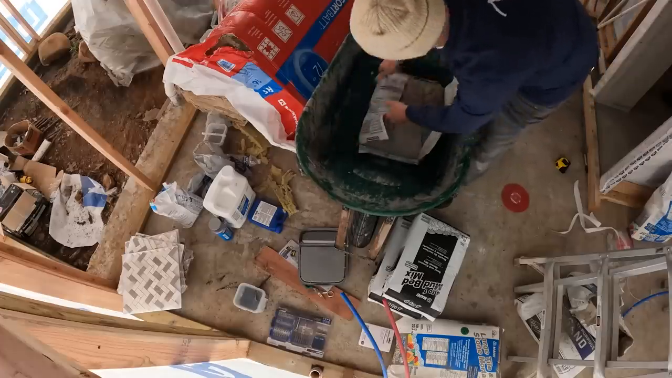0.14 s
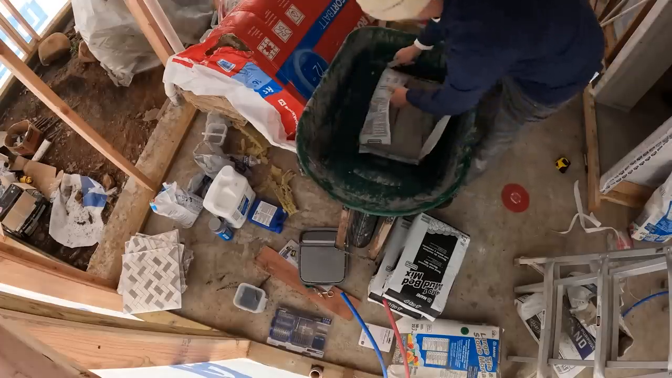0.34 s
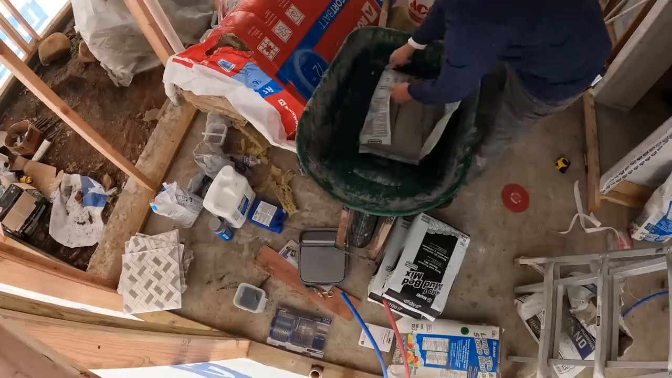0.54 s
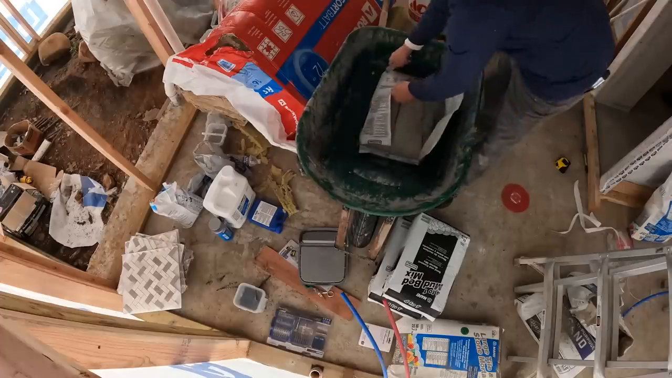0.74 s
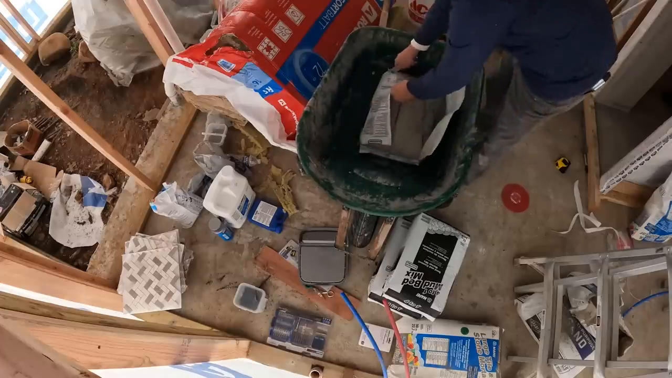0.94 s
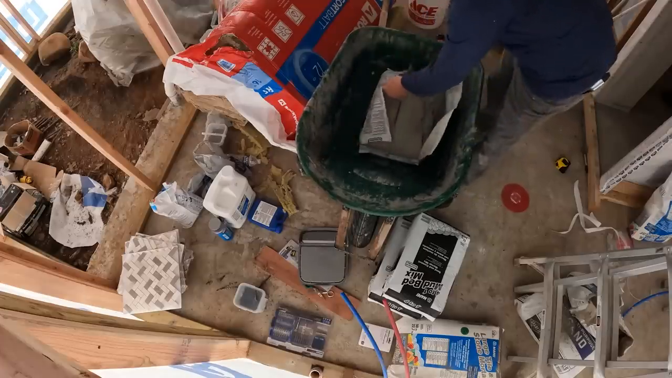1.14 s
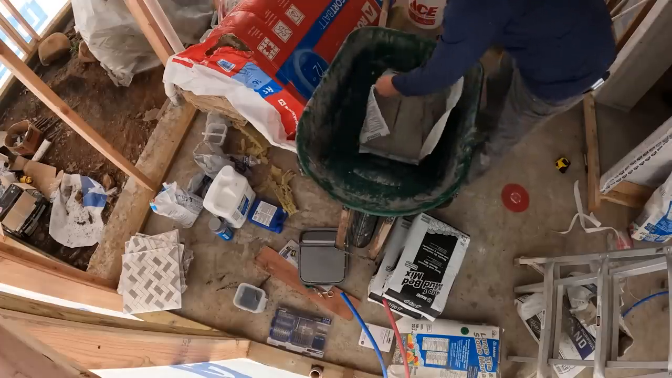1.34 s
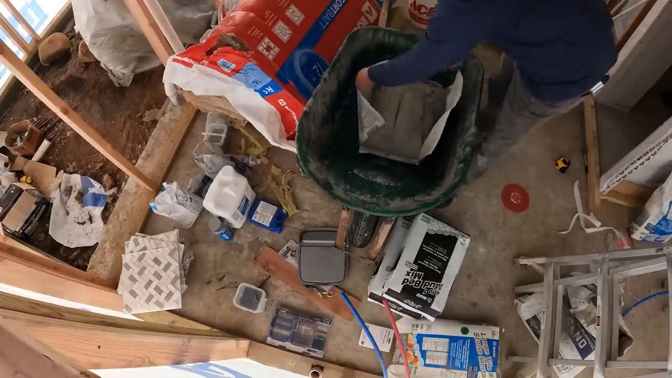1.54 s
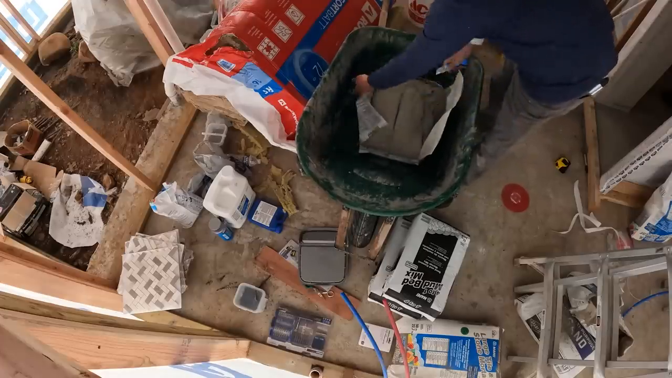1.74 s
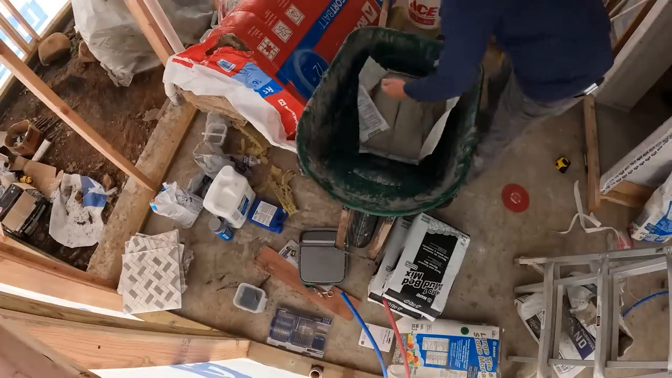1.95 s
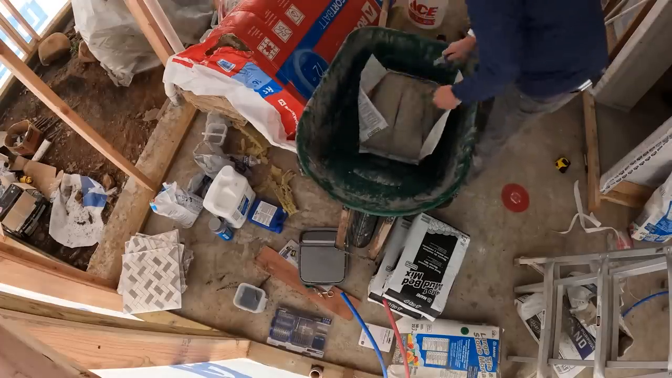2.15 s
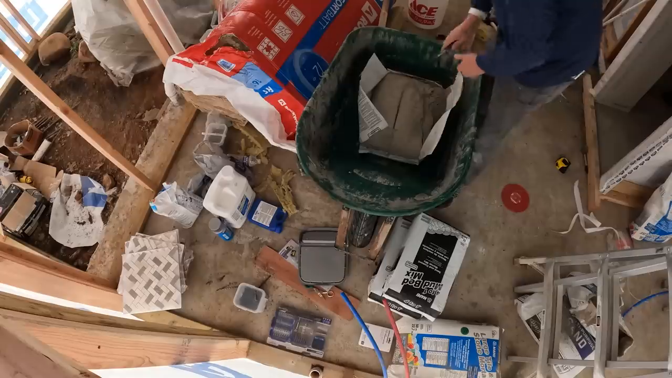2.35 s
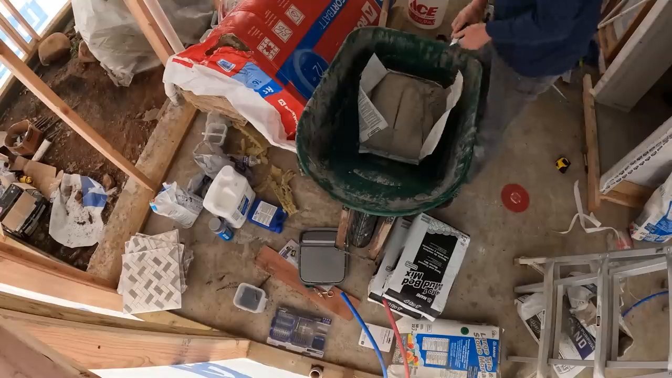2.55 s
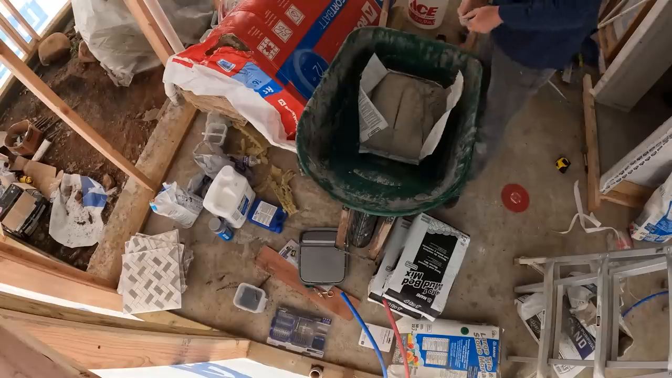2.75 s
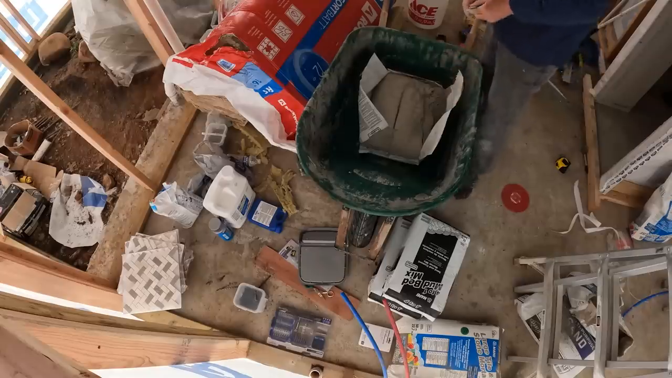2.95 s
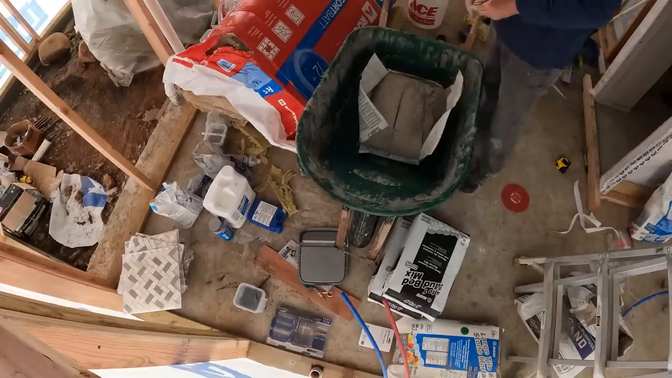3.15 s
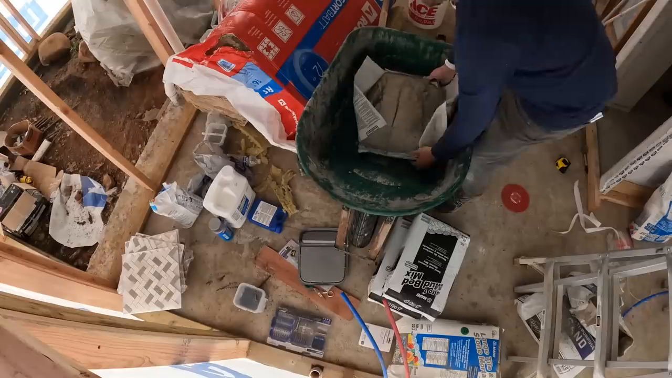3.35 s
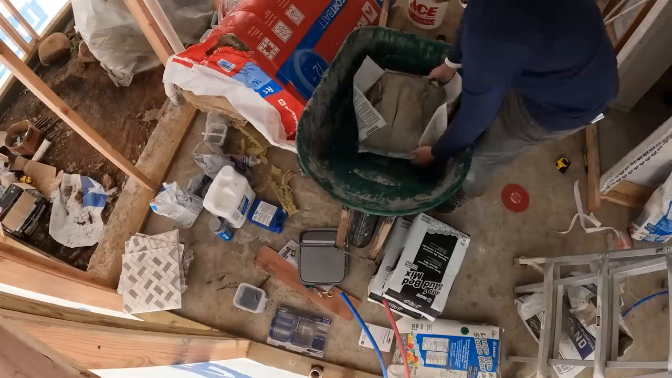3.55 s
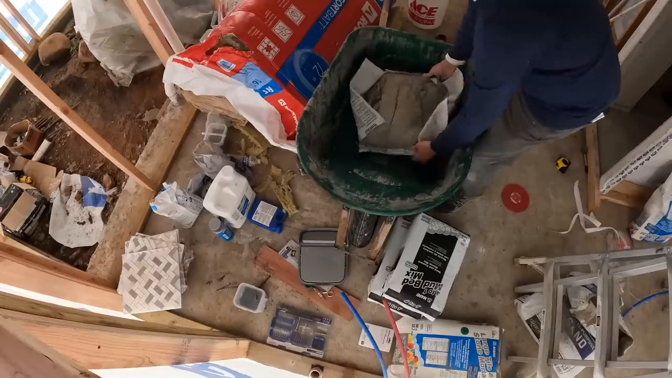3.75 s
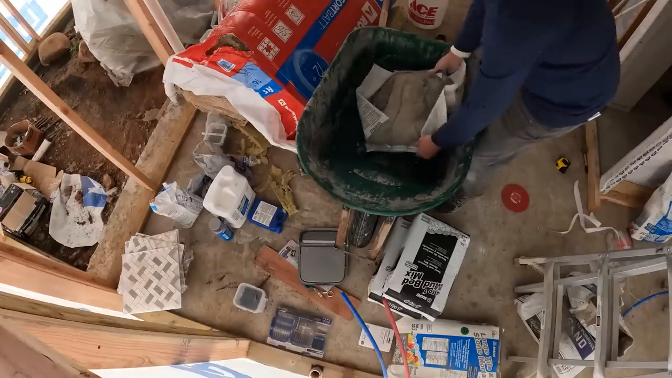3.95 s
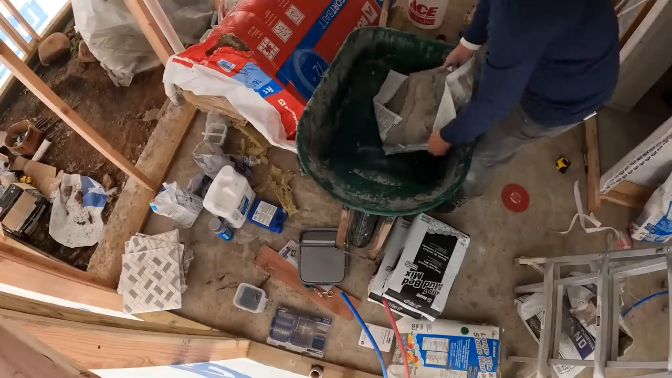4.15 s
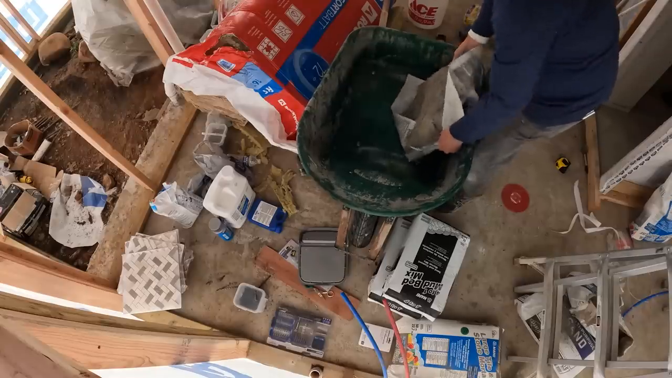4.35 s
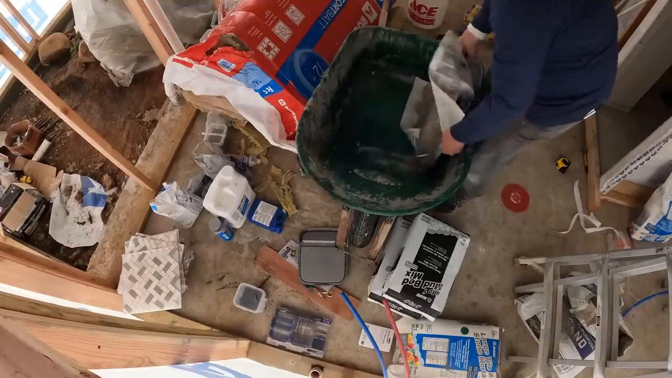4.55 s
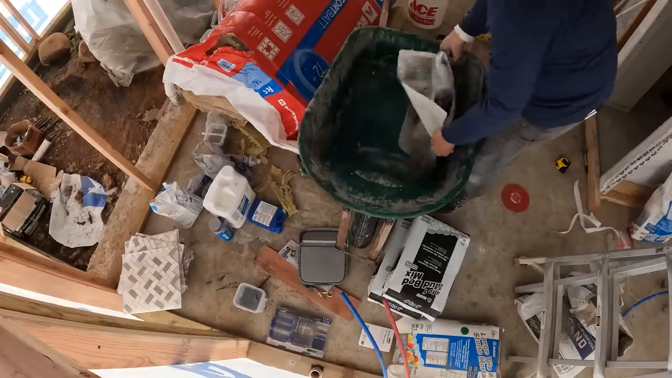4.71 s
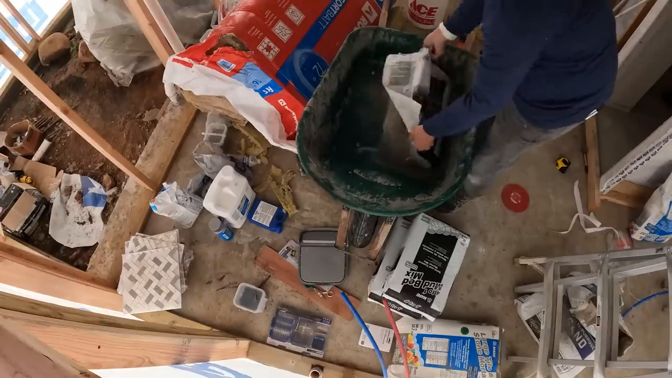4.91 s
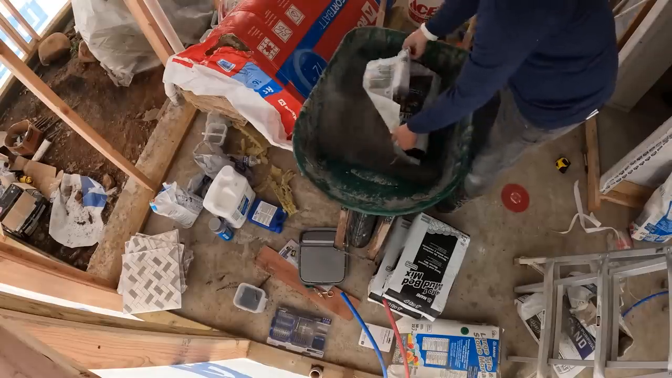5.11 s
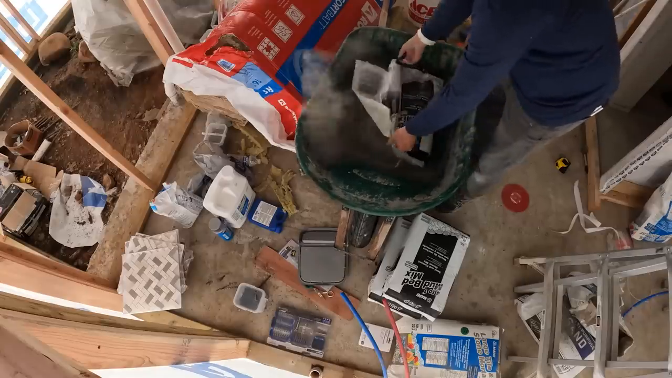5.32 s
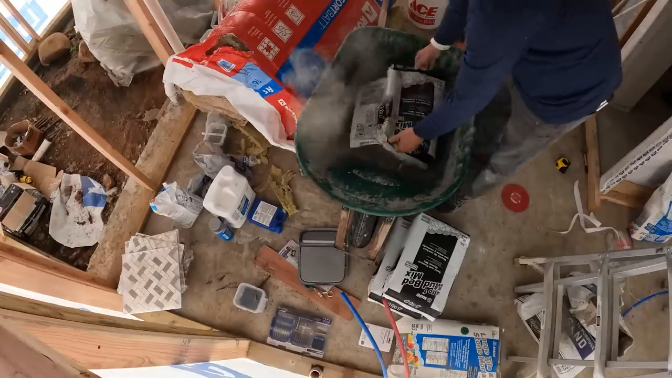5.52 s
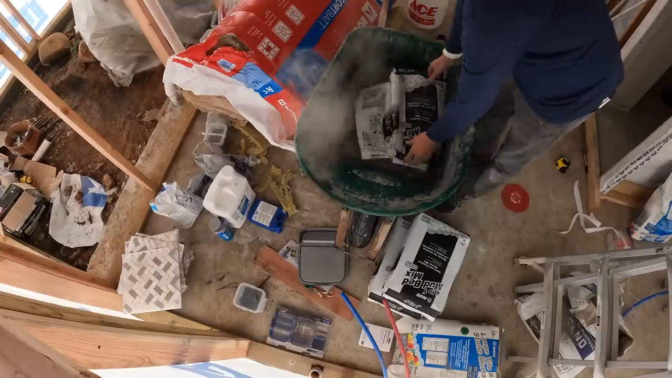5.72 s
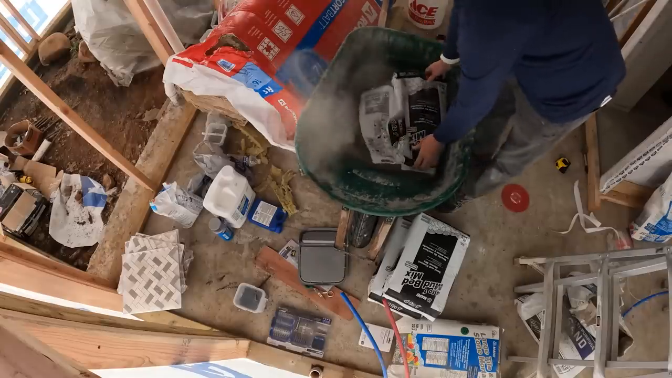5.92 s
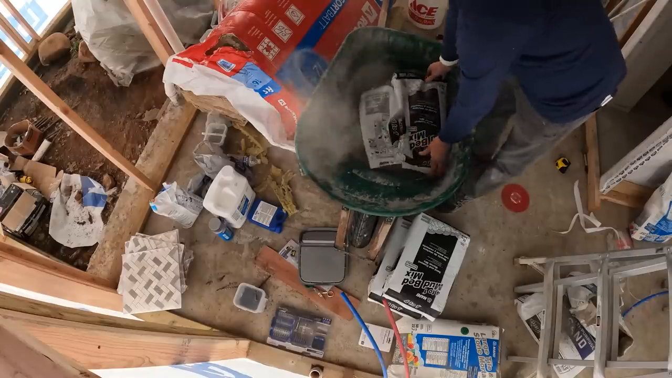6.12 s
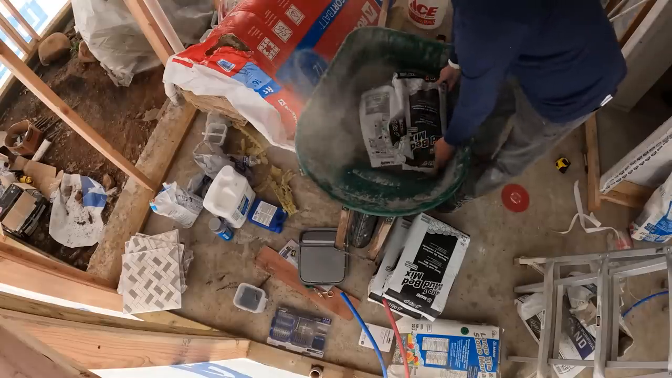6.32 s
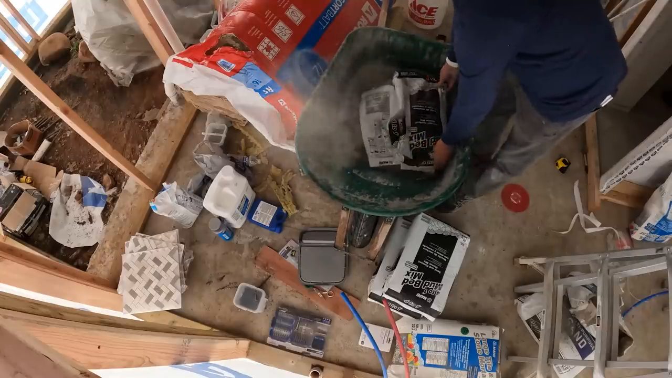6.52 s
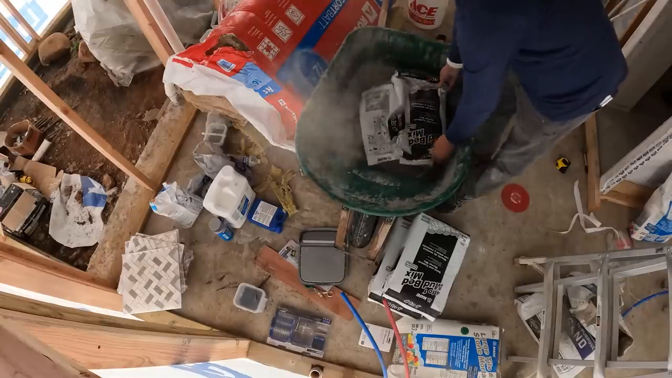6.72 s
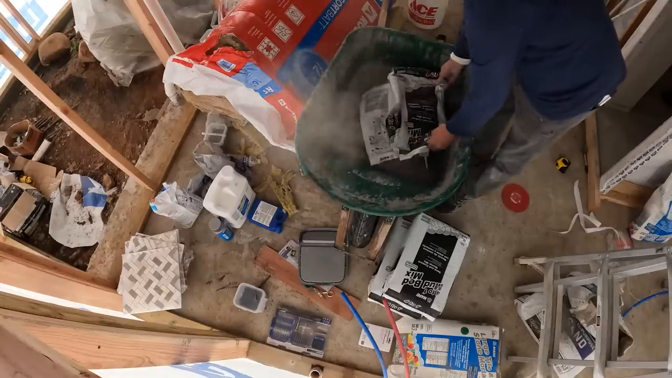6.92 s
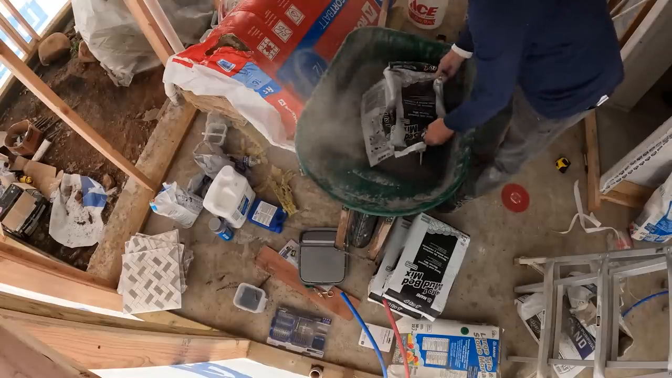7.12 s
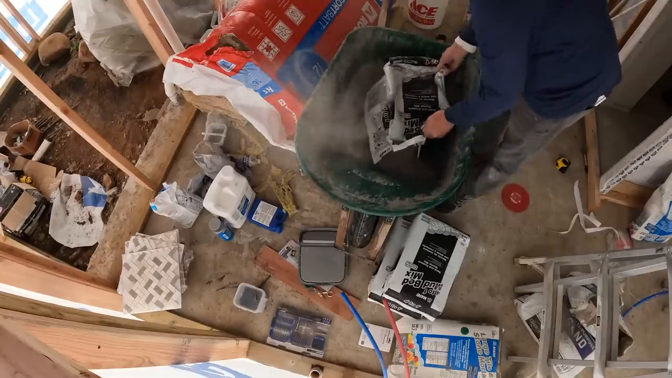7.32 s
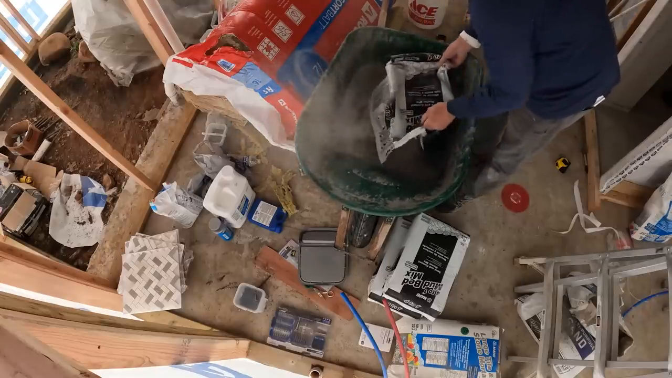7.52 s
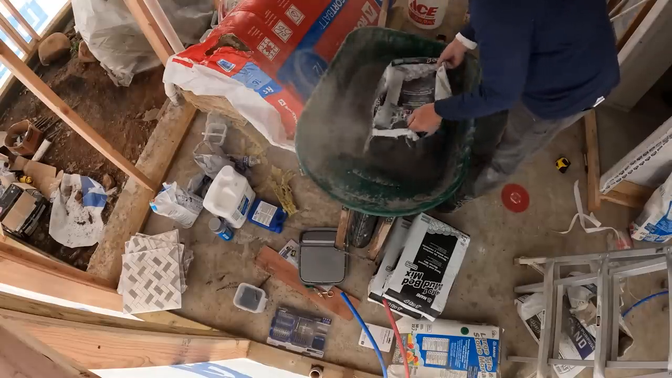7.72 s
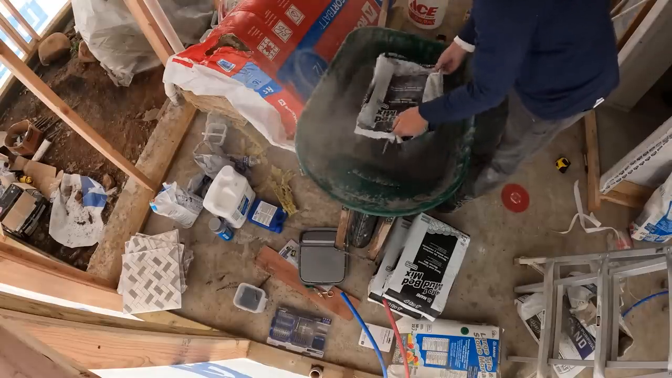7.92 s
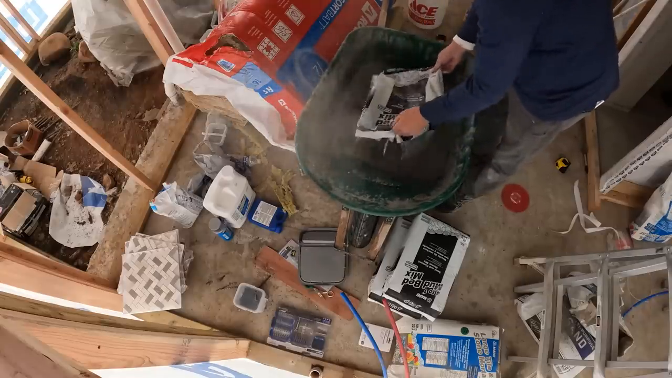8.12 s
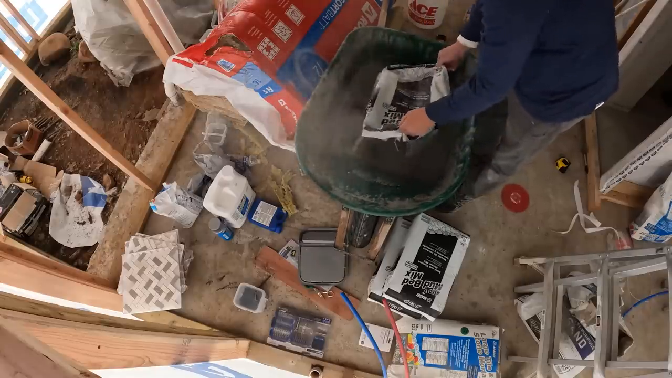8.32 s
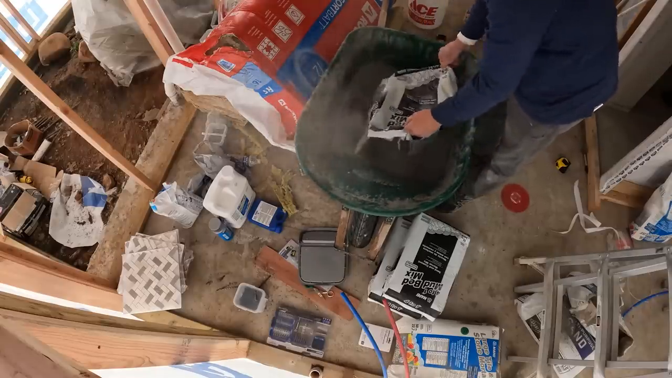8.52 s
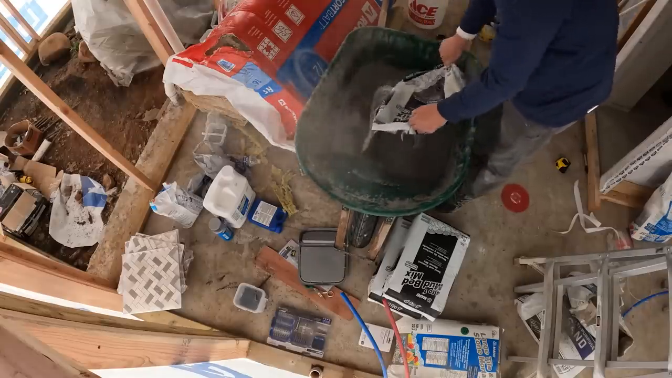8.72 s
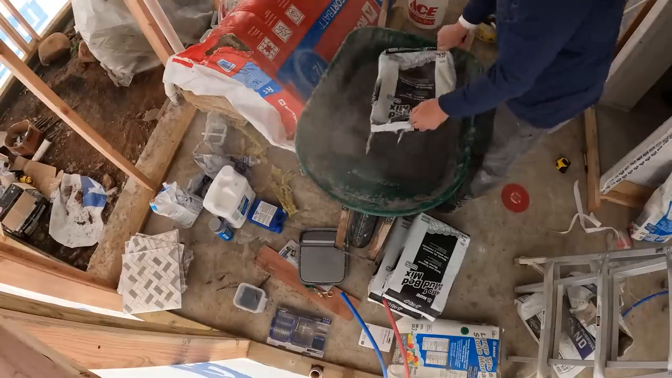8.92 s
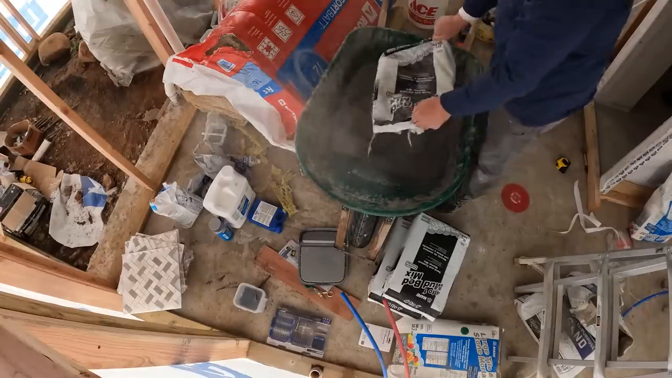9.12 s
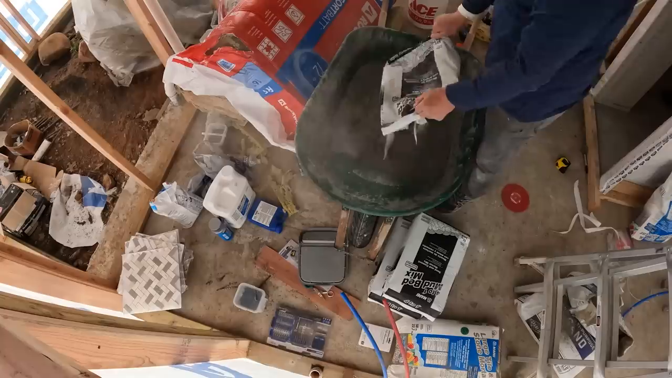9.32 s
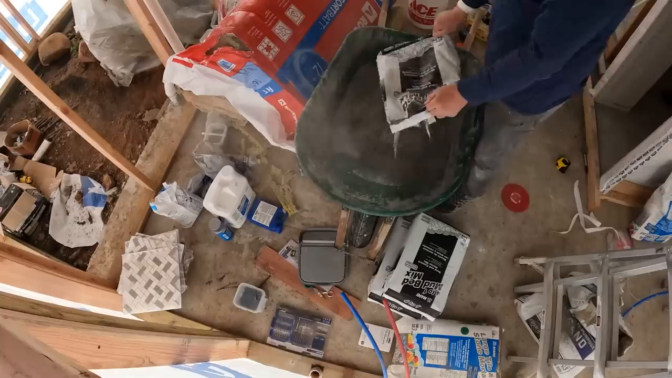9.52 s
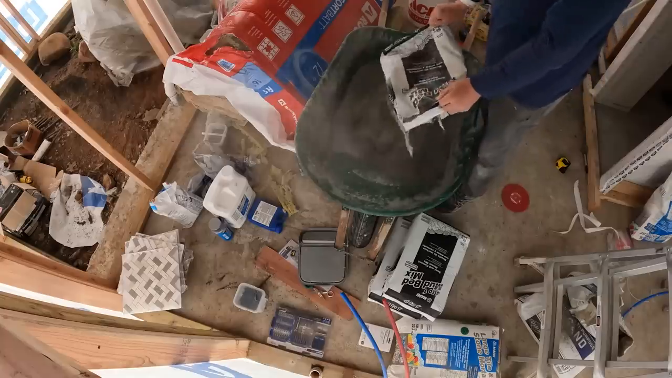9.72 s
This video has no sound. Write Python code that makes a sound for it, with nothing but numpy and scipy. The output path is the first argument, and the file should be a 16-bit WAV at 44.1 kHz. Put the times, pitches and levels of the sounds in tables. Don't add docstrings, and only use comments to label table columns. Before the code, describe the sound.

A stiff paper sack is rustled and snapped open, then tipped with heavy booming thumps into a steel tub, powder hissing, and shaken empty with crackling flaps.

```python
import sys
import numpy as np
from scipy import signal
from scipy.fft import rfft, irfft, next_fast_len
from scipy.io import wavfile
from scipy.ndimage import uniform_filter1d, map_coordinates

SR = 44100
rng = np.random.default_rng(int(sys.argv[2]) if len(sys.argv) > 2 else 0)


def gain_from_db(level_db):
    decades = np.asarray(level_db, float) / 20
    return 10 ** decades


def persist_wave(psi):
    counts = np.round(np.clip(psi, -1, 1) * 32767).astype(np.int16)
    wavfile.write(sys.argv[1], SR, np.atleast_2d(counts).T)


N = 430416


def unit(x):
    return x / np.sqrt(np.mean(x ** 2) + 1e-20)


def along(points, hz):
    f, v = np.transpose(points)
    return np.interp(np.log(hz + 1), np.log(f + 1), v)


def curves(rows):
    s, *cols = np.transpose(rows)
    return [np.interp(np.arange(N) / SR, s, c) for c in cols]


def steps():
    return np.arange(0, N / SR + .002, .002)


def swells(rows, rise, fall):
    s, hold, *cols = np.transpose(rows)[:, :, None]
    swelling = np.minimum(rise * (steps() - s), 0)
    easing = fall * np.maximum(steps() - s - hold, 0)
    return swelling - easing, cols


def summed(bed_db, events_db):
    power = gain_from_db(2 * np.maximum(events_db, -200)).sum(axis=0)
    return 10 * np.log10(gain_from_db(2 * bed_db) + np.interp(np.arange(N) / SR, steps(), power))


def wobble(rate):
    coarse = np.arange(0, N + 64, 64)
    knots = rng.standard_normal(int(N * rate / SR) + 4)
    return np.interp(np.arange(N), coarse, map_coordinates(knots, [coarse * rate / SR]))


def filtered(x, response):
    m = next_fast_len(N + SR // 2)
    return irfft(rfft(x, m) * response(np.fft.rfftfreq(m, 1 / SR)), m)[..., :N]


def lowpass(f, hz, order=8):
    return 1 / (1 + (f / hz) ** order)


def highpass(f, hz):
    return 1 / (1 + (hz / (f + 1)) ** 8)


def resonant(modes):
    return lambda f: sum((-1) ** k * gain_from_db(db) * 1j * f * w / (c * c - f * f + 1j * f * w)
                         for k, (c, w, db) in enumerate(modes))


def patchy(patchy_db, size=4):
    z = signal.stft(rng.standard_normal((2, N)), nperseg=256, noverlap=128)[2].astype(np.complex64)
    field = uniform_filter1d(rng.standard_normal(z.shape[1:]), size=size, axis=0)
    field = uniform_filter1d(field, size=6, axis=1)
    return unit(signal.istft(z * gain_from_db(patchy_db * unit(field)), nperseg=256)[1][:, :N])


# (frequency [Hz], likeness [0 to 1])
LIKENESS = [(60, 0.93), (300, 0.95), (640, 1), (1400, 0.93), (3100, 0.46), (7000, 0.86), (15000, 0.23)]


def spread(pair, response):
    turn = lambda hz: np.arccos(np.clip(along(LIKENESS, hz), -1, 1)) / 2
    mid, side = filtered(pair, lambda hz: response(hz) * [np.cos(turn(hz)), np.sin(turn(hz))])
    return unit(np.array([mid + side, mid - side]))


# (frequency [Hz], density [dB per Hz])
YARD_COLOUR = [(12, -44), (20, 6), (63, -10), (126, -5), (268, -20.5), (510, -19), (891, -65), (5780, -32),
               (9300, -45), (15800, -86)]


def yard_air():
    level_db = -58
    return gain_from_db(level_db) * spread(patchy(patchy_db=-1.0), lambda f: gain_from_db(along(YARD_COLOUR, f)))


# (frequency [Hz], t60 [s])
WALL_DECAY = [(200, 0.41), (1500, 0.087), (5000, 0.11), (12000, 0.059)]


def walls(x):
    out, step = np.zeros((2, N + SR)), SR // 2
    delay = 130
    for start in range(0, N, step):
        hz, t, z = signal.stft(rng.standard_normal((2, SR // 4)), SR, nperseg=256)
        decay = gain_from_db(-60 * t / along(WALL_DECAY, hz)[:, None])
        tail = signal.istft(z * decay, SR, nperseg=256)[1]
        answer = signal.fftconvolve(x[None, start:start + step], tail / np.linalg.norm(tail[0]), axes=1)
        out[:, start + delay:][:, :answer.shape[1]] += answer
    return out[:, :N]


# (frequency [Hz], level [dB], t60 [s])
PANEL_MODES = [(138.7, 3, 1.54), (168, -8.5, 2.2), (236, 2.5, 1.9), (266, -7, 0.92), (300.6, -2, 2),
               (310.5, 1.5, 1.63), (350, -6, 2.3), (380, -6, 0.93), (425, 1.5, 1.2), (436, -9, 1.4),
               (515, -13, 1.5), (523, -7, 1.2), (566, -40, 0.38)]


def panels(t, upper_db, damp, detune):
    hz, db, t60 = np.transpose(PANEL_MODES)[:, :, None]
    lift, shift, phase = rng.standard_normal((3, len(PANEL_MODES), 1))
    size = gain_from_db(db + upper_db * (hz > 300) + 2 * lift - 60 * t / (damp * t60))
    return np.sum(size * np.sin(2 * np.pi * hz * (1 + detune * shift) * t + phase), axis=0)


# (time [s], hold [s], lowest mode level [dB], second mode level [dB])
NUDGES = [(0, 0.12, -53, -44.5), (.15, 0.56, -54.5, -58), (.82, 0.23, -47.5, -51), (1.1, 0.23, -48, -42.5),
          (1.3, 0.4, -50, -51.5), (1.7, 0.3, -56.5, -74), (2.13, 0.68, -47.5, -50), (2.85, 0.59, -58, -68),
          (3.6, 0.23, -56, -53), (3.92, 0.61, -45.5, -41), (4.67, 0.12, -33, -35), (4.85, 0.2, -39, -42),
          (5.065, 0.033, -44, -23), (5.14, .035, -40, -22.5), (5.25, 0.087, -37, -22.5),
          (5.4, 0.11, -33, -29.5), (5.6, 0.38, -37.5, -48), (6.25, 0.19, -43.5, -40.5),
          (6.64, 0.16, -44, -59), (6.9, 0.81, -51.5, -63)]
# (lowest mode [dB], second mode [dB])
REST_LEVELS = [-59, -76]
# (time [s], frequency [Hz])
SECOND_MODE = [
    (0, 98.05),
    (2.05, 100),
    (2.1, 106.5),
    (2.9, 105.8),
    (3.5, 97.9),
    (9.76, 99),
]


def rocking():
    shape, modes = swells(NUDGES, rise=802, fall=140)
    low_db, second_db = (summed(rest, shape + db) for rest, db in zip(REST_LEVELS, modes))
    drift = lambda hz, unsteady: np.sin(2 * np.pi * np.cumsum(hz * (1 + unsteady * wobble(22))) / SR)
    low = gain_from_db(low_db + 1.0 + 1.7 * wobble(10)) * drift(56, unsteady=0.0988)
    second = gain_from_db(second_db + 1.0 + 3.35 * wobble(10)) * drift(curves(SECOND_MODE)[0], unsteady=0.0545)
    return low + second


# (time [s], peak level [dB], upper modes over peak [dB], rise [s])
BLOWS = [(1.111, -29, 3, 0.0039), (1.218, -50, 7, 0.0035), (2.111, -38, 5.5, 0.0041),
         (2.529, -58.5, 15, 0.0018), (3.591, -43, 4.5, 0.005), (3.892, -39.5, 23.5, 0.0024),
         (4.668, -15.5, 2.5, 0.003), (5.037, -19, 2, 0.0065), (5.068, -10.5, -32, 0.0039),
         (5.389, -15, 5.5, 0.0017), (6.24, -34, 6, 0.0034), (7.798, -45.5, 34.5, 0.011)]


def blows():
    out, t = np.zeros(N), np.arange(SR) / SR
    deep = signal.butter(2, [62, 240], "band", fs=SR)
    knock = signal.butter(2, [300, 900], "band", fs=SR)
    out[:SR] += gain_from_db(-45.0) * panels(t, upper_db=7.0, damp=0.96, detune=0)
    out[:SR] += gain_from_db(-21.5 - 60 * t / 1.4) * signal.lfilter(*deep, rng.standard_normal(SR))
    t = t[:SR // 2]
    sag = np.cumsum(72 + 60 * np.exp(-t / 0.0083)) / SR
    for s, db, upper_db, rise in BLOWS:
        loaded = s > 3.5
        thud, slap = rng.standard_normal((2, len(t)))
        push = gain_from_db(-17.5) * panels(t, upper_db, .18 if loaded else .4, detune=0.0284)
        push += gain_from_db(8.5 - 60 * t / 0.74) * signal.lfilter(*deep, thud)
        push += gain_from_db(upper_db - 1.0 - 60 * t / 0.13) * signal.lfilter(*knock, slap)
        push += gain_from_db(-3.5 - 60 * t / 0.21) * loaded * np.sin(2 * np.pi * sag)
        out[round(s * SR):][:len(t)] += gain_from_db(db) * push * (1 - np.exp(-t / rise))
    return out


# (time [s], length [s], pitch [Hz], level [dB])
SINGING = [(2.812, .03, 1520, -37), (2.827, 0.049, 1396, -38), (2.83, 0.046, 1140, -39.5),
           (2.838, 0.09, 924, -47), (3.21, 0.082, 1500, -55), (3.35, .045, 1560, -61),
           (3.697, 0.055, 370, -43), (4.267, 0.07, 1070, -36), (3.214, .08, 1910, -50),
           (5.399, 0.045, 380, -36), (1.252, 0.045, 1330, -39)]


def singing():
    out, edge_s = np.zeros(N), 0.004
    sag = 0.082
    for s, length, hz, db in SINGING:
        t = np.arange(round((length + 6 * edge_s) * SR)) / SR
        knots = rng.standard_normal((2, 12))
        stray, size = (np.interp(t, np.arange(12) / 85, k) for k in knots)
        shape = (1 - np.exp(-t / edge_s)) * np.exp(-np.maximum(t - length, 0) / edge_s)
        tone = np.sin(2 * np.pi * np.cumsum(hz * (1 - sag * t + 0.023 * stray)) / SR)
        out[round(s * SR):][:len(t)] += gain_from_db(db) * (0.84 + size) * shape * tone
    return out


def snaps(creases):
    out, t = np.zeros((2, N + SR)), np.arange(SR // 20) / SR
    sheet = signal.butter(2, [560, 4200], "band", fs=SR)
    bright = signal.butter(2, [3600, 9500], "band", fs=SR)
    fade = lambda t60: gain_from_db(-60 * t / t60)
    flap_fade = 1.02 * fade(0.0038) + 0.92 * fade(0.018) + 0.12 * fade(0.17)
    crack_fade = fade(0.013) + 0.079 * fade(0.028)
    onset = 1 - np.exp(-t / 0.00024)
    for s, db, crease_hz, bright_db in creases:
        dull, sharp = rng.standard_normal((2, len(t)))
        panel = 1.3 * np.sin(2 * np.pi * crease_hz * t) * fade(15 / crease_hz) * (1 - np.exp(-t * crease_hz))
        flap = 0.91 * signal.lfilter(*sheet, dull) * flap_fade
        crack = gain_from_db(bright_db + 2.0) * signal.lfilter(*bright, sharp) * crack_fade
        side = gain_from_db((1.1 * sharp[0] - 1.2) * np.array([[.5], [-.5]]))
        out[:, round(s * SR):][:, :len(t)] += gain_from_db(db - 5.5) * side * (panel + flap + crack) * onset
    return out[:, :N]


# (time [s], peak level [dB], crease pitch [Hz],
# brightness [dB])
MORE_TICKS = [(0.885, -31, 3390, -18), (1.258, -19, 1340, -18), (1.369, -24, 1140, -18), (1.437, -27, 1360, -18),
              (1.56, -30, 1410, -18), (1.717, -34, 1340, -18), (1.73, -21, 2430, -18), (3.575, -37, 1280, -18),
              (3.653, -24, 818, -18), (3.693, -33, 1200, -18), (6.828, -18.5, 730, -16), (7.72, -22, 1350, -18),
              (7.765, -19, 1260, -18), (7.877, -15, 1500, -18), (7.994, -21, 1250, -18), (8.207, -24, 1310, -18),
              (8.295, -20, 830, -18), (8.448, -19, 1520, -18), (8.479, -10, 2040, -16), (8.908, -23, 1190, -18),
              (9.547, -25, 1290, -18)]


def more_ticks():
    return gain_from_db(-2.0) * snaps(MORE_TICKS)


# (time [s], peak level [dB], crease pitch [Hz], brightness [dB])
TICKS = [(0.6602, -29.5, 1200, -19), (0.698, -27, 3450, -22), (0.7525, -30, 1250, -23),
         (0.7618, -25, 1370, -28), (0.7822, -27, 1180, -27), (0.8517, -32, 1320, -21),
         (1.033, -25.5, 4350, -7), (3.7408, -33, 1550, 7.5), (3.8243, -25.5, 2380, -11),
         (4.0946, -19, 1180, -8), (4.779, -36, 1360, -16), (4.8589, -17, 3190, -10),
         (4.872, -26, 1290, -16), (4.9035, -16.5, 1280, -16), (4.9705, -21, 1290, 4),
         (5.3306, -24.5, 2120, -1.5), (5.4844, -24, 840, -5), (5.714, -15.5, 1100, -19),
         (5.7419, -15.5, 1260, -6), (5.9366, -20.5, 1520, -12), (5.9698, -26, 1130, -24),
         (6.0706, -18.5, 2600, -21), (6.167, -28, 1200, -20), (6.1857, -21, 1090, -23),
         (6.294, -30.5, 1070, -10), (6.3664, -28, 1460, -14), (6.5879, -21, 770, -22),
         (6.6285, -24, 1340, -25), (6.6556, -24.5, 1030, -26), (6.683, -26, 1270, -19),
         (6.712, -29, 1320, -16), (8.0146, -22, 1250, -31), (8.1464, -21, 1620, -20),
         (8.1818, -23, 1270, -18), (8.3622, -31, 1150, -17), (8.6564, -30.5, 1350, -24),
         (8.734, -41, 1290, 2), (8.8275, -26, 1280, -24), (9.0246, -22, 1290, -26),
         (9.0982, -24, 1280, -17), (9.1775, -29, 1240, -19), (9.494, -25, 1210, -17),
         (9.625, -20, 950, -19), (9.6776, -24, 920, -15), (9.7313, -16.5, 1370, -15)]


def ticks():
    return gain_from_db(3.5) * snaps(TICKS)


# (time [s], peak level [dB],
# crease pitch [Hz], brightness [dB])
CREASES = [(0.7305, -14.5, 2030, -28), (0.9555, -17.5, 1500, -3), (1.052, -16.5, 1230, -33),
           (1.1151, -9, 3300, -2.5), (1.1257, -8, 1740, -7), (1.1383, -17.5, 3900, 3),
           (1.154, -11.5, 2570, -27), (1.1867, -12.5, 2500, -13), (1.2200, -2, 2400, -15),
           (1.2834, -16, 1260, -16), (1.522, -20.5, 1380, -29), (1.5818, -20, 1290, -36),
           (1.6372, -17.5, 880, -29.5), (1.7983, -12.5, 826, -10), (1.8128, -1.5, 3880, -4.5),
           (1.8422, -5.5, 2540, -30), (1.9639, -13, 1370, -13), (1.9949, -11.5, 2390, -26),
           (2.8105, -19, 1530, -20), (2.973, -32.5, 3350, -5), (3.1991, -44, 2830, -26.5),
           (3.407, -14, 2010, -11), (3.4478, -9, 1320, -4), (3.908, -12, 1600, -24),
           (4.4409, -6, 3930, -6.5), (4.5605, -12.5, 2020, -28), (5.1536, -12.5, 1120, -18),
           (5.2535, -15.5, 1300, -1), (5.444, -12, 2300, -31), (5.5091, -10, 950, -16),
           (5.5636, -11.5, 1220, -23), (5.6198, -10, 790, -6.5), (5.7265, -10.5, 1440, -4.5),
           (5.7655, -13, 2570, -7.5), (5.805, -17.5, 1150, -21), (5.8576, -9.5, 1270, -14),
           (5.9183, -15, 1580, -0.5), (5.9877, -15.5, 1180, -33), (6.023, -17.5, 1100, -28),
           (6.094, -12.5, 1280, -7), (6.1394, -10.5, 1180, -35), (6.1795, -11, 3020, -32),
           (6.204, -16, 1250, -29),
           (6.418, -16, 1180, -6.5), (6.4832, -18.5, 1180, -28), (6.5358, -14, 1180, -34),
           (6.7492, -11.5, 2520, -32), (6.7558, -10.5, 1250, -31), (6.8543, -9, 2940, -16),
           (6.8768, -16, 4700, 4), (6.9545, -9.5, 1290, -8), (6.907, -13.5, 1300, -15),
           (6.999, -9.5, 1330, -9), (7.012, -12.5, 1460, -11), (7.063, -8, 1330, -9),
           (7.068, -5.5, 1280, -9.5), (7.1067, -10, 4450, -23), (7.124, -8, 1380, -13),
           (7.1492, -9, 1240, 1.5), (7.8027, -5.5, 1330, -34), (7.859, -7, 1520, -10),
           (8.322, -16, 2540, -33), (8.468, -9, 3280, -33), (8.5022, -9, 1260, -34), (8.848, -14, 1150, -7),
           (8.9396, -6, 2400, -16), (9.2322, -18.5, 1180, -43), (9.5887, -9, 2870, -8)]


def creases():
    return snaps(CREASES)


def buckling(rate, scatter_db, t60):
    chance = rate / SR * gain_from_db(4.5 * wobble(18))
    sizes = gain_from_db(scatter_db * np.minimum(rng.exponential(size=N), 4))
    folds = (rng.random(N) < chance) * sizes
    return unit(signal.lfilter([1], [1, -gain_from_db(-60 / (t60 * SR))], folds))


# (time [s], rustle level [dB], crinkle of buckling over sliding powder [dB],
# cupping, the ring of the folded sheet [dB], slack, boom over rustle [dB])
GRIP = [(0, -47.5, 8.5, 20, 5), (.22, -48.5, 5, -8, -7), (.55, -44, 2, -19, -17), (.88, -57.5, 6, -17, 4),
        (1.25, -51.5, 3.5, 4.5, -2.5), (1.95, -39.5, 4.5, 0, -8.5), (2.09, -59.5, 9, -6, -9),
        (2.43, -71, 6, -12.5, -1), (2.75, -69.5, -18, 8, -4.5), (3.04, -70.5, 9.5, -8, 12.5),
        (3.38, -75, -3.5, 2.5, -13), (3.6, -59, 0, -4, -20), (3.94, -33.5, 1.5, 2, -1.5),
        (4.35, -28, -5.5, 0.5, -7.5), (5.4, -44.5, 7.5, 1, -6), (6.26, -48, 4, 3, -9),
        (7.5, -43, -16, -3, -9), (8.65, -52.5, 1, 5.5, -3.5), (9.76, -40.5, 5, 5, 0.5)]
# (time [s], flow level [dB])
FLOW = [(0, -59.5), (.515, -42.5), (.68, -58), (1.55, -50.5), (2.07, -60), (2.49, -71.5), (3.4, -75),
        (3.55, -65), (3.92, -33.5), (4.67, -32.5), (5.4, -47), (6.66, -52), (7.09, -42.5), (7.285, -42.5),
        (7.65, -36.5), (7.74, -49.5), (8.6, -55.5), (9.76, -41)]
# (time at full strength [s], hold [s], rustle level [dB], hiss over rustle [dB], boom over rustle [dB])
PULLS = [(.755, 0.015, -42, -24, 0.5), (.825, 0.028, -59.5, -20, 15.5), (1.116, 0.041, -37, -1.5, -8),
         (1.225, 0.068, -30.5, -6, -8), (1.36, 0.01, -40, -1.5, -15), (1.59, 0.0092, -37, -47, -8),
         (1.645, 0.015, -37.5, -46, -5.5), (1.814, 0.043, -29.5, -2.5, -20), (1.966, 0.0098, -42.5, 4, -14),
         (2.775, 0.026, -56, -3, 4.5), (2.85, 0.0052, -35.5, -14, -8), (2.89, 0.041, -64.5, -20, 18),
         (3.69, 0.022, -44.5, -11, 3), (4.0, 0.15, -33.5, -9, -1), (4.665, 0.04, -30, -7, -3),
         (4.89, 0.033, -29, -1, -11), (5.0, 0.23, -33.5, -1.5, -3.5), (5.259, 0.063, -35, -8, -4),
         (5.485, 0.019, -27, -7, -9), (5.71, 0.028, -36, -11, -13), (5.793, 0.093, -35.5, -2.5, -14),
         (5.97, 0.22, -37, -10, -12), (6.315, 0.07, -45.5, 3, -6), (6.42, 0.052, -43, -5, -21),
         (6.53, .07, -43, -22, -12), (6.63, 0.039, -59, -28, -5), (6.755, 0.019, -42, -22, -24),
         (6.905, 0.14, -38.5, -8, -17), (7.2, 0.23, -43.5, -16, -2.5), (7.603, 0.057, -43, 0, -23),
         (7.821, 0.071, -30.5, -5, -7.5), (8.02, 0.047, -35.5, -8.5, -5.5), (8.082, 0.14, -41, -8.5, 0.5),
         (8.332, 0.22, -49, -6.5, -2), (8.84, 0.022, -36, -14, -7.5), (9.025, 0.037, -38.5, -22, -6),
         (9.18, .02, -35.5, -28, -10), (9.41, 0.015, -31.5, -11, -10), (9.5, 0.067, -35, -25, -8),
         (9.685, 0.045, -31.5, -16, -4.5)]
# (time [s], fade [dB per s], rustle level [dB], hiss over rustle [dB], boom over rustle [dB])
JERKS = [(0.724, 300, -32, -16, -11), (.954, 33, -48, 2, -9), (2.109, 88, -71.5, -13, 24.5),
         (2.812, 148, -37.5, -36, -5), (3.199, 159, -41, -4, -20), (3.406, 100, -36.5, -3.5, -10),
         (3.594, 64, -46.5, 0, 0.5), (5.07, 139, -27.5, -62, 2.5), (5.392, 50, -40, -8, 7),
         (5.562, 154, -28.5, -15, -5), (5.619, 197, -34, -3, -2), (6.75, 350, -36, -67, -32),
         (8.466, 142, -34, -5, -14), (8.807, 11, -41, -5, -3.5), (9.229, 89, -27.5, -20, -7),
         (9.39, 68, -43, -17, -12), (9.588, 25, -34.5, -11, -7)]


def moves():
    grip_db, _, _, slack_db = curves(GRIP)
    pulls, pull = swells(PULLS, rise=319, fall=226)
    s, fade, *jerk = np.transpose(JERKS)[:, :, None]
    jerks = np.where(steps() < s, 4000, -fade) * (steps() - s)
    rustle_db, hiss_over, boom_over = (np.vstack(pair) for pair in zip(pull, jerk))
    rustle_db = rustle_db + np.vstack([pulls, jerks])
    rustle = summed(grip_db, rustle_db)
    hiss = summed(curves(FLOW)[0], rustle_db + hiss_over)
    boom = summed(grip_db + slack_db, rustle_db + boom_over)
    return rustle, hiss, boom


# (frequency [Hz], density [dB per Hz])
SHEET_COLOUR = [(550, -13), (800, -10), (1050, -5), (1300, 1), (1800, -3), (2500, -1.5), (3500, -3.5),
                (5200, -7), (7000, 10.5), (12000, -65)]
# (frequency [Hz], density [dB per Hz])
FINES_COLOUR = [(2060, -28), (3500, 2), (5270, -1.5), (6060, -6), (7600, -6.5), (9420, -11.5),
                (11700, -16.5), (13200, -16), (15800, -26)]
# (frequency [Hz], width [Hz], level [dB])
SACK_MODES = [(155, 29, 1.5), (266, 30, -2), (364, 49, -1), (736, 130, -6.5)]
# (frequency [Hz], width [Hz], level [dB])
CUP_MODES = [(849, 134, 0), (1180, 143, 2.5), (1550, 295, -3.5)]


def sack():
    rustle_db, hiss_db, boom_db = moves()
    crinkle, cupping = gain_from_db(curves(GRIP)[1:3])
    folds = buckling(rate=200, scatter_db=1.5, t60=0.018)
    gate = (4.0 + crinkle * folds) / np.sqrt(1 + crinkle + crinkle ** 2)
    stir = gate * gain_from_db(0.64 * wobble(25))

    sheet = spread(stir * patchy(patchy_db=2.0, size=2),
                   lambda f: gain_from_db(along(SHEET_COLOUR, f)) * lowpass(f, 4800))
    cup = spread(stir * gain_from_db(0.33 * wobble(30)) * patchy(patchy_db=2, size=1),
                 lambda f: resonant(CUP_MODES)(f) * highpass(f, 750))
    fines = spread(stir * patchy(patchy_db=1.5),
                   lambda f: gain_from_db(along(FINES_COLOUR, f)) * highpass(f, 4200))
    body = spread(stir ** 0.78 * patchy(patchy_db=2.5),
                  lambda f: resonant(SACK_MODES)(f) * lowpass(f, 1000, order=4) * highpass(f, 135))

    emptied = np.clip((np.arange(N) / SR - 5.4) / 4.9, 0, .55)
    body = body - emptied * filtered(body, lambda f: lowpass(f, 210))
    taut = 1 - np.clip(gain_from_db(0.57 * (boom_db - rustle_db) + 3.0), 0, 1.6)
    sheet = sheet - taut * filtered(sheet, lambda f: lowpass(f, 1020))
    paper = (1.195 * sheet + .6 * cupping * cup) / np.sqrt(1.5 + .36 * cupping ** 2)
    return gain_from_db(rustle_db) * paper + gain_from_db(hiss_db - 0.82) * fines + gain_from_db(boom_db) * body


def scene():
    snapping = creases() + ticks()
    echo = gain_from_db(-4.0) * walls(snapping.mean(axis=0))
    tub = rocking() + blows()
    return yard_air() + echo + tub + singing() + more_ticks() + snapping + sack()


def top_cut(x):
    return signal.sosfilt(signal.butter(12, 15840, fs=SR, output="sos"), x)


# (frequency [Hz], left over right [dB])
PORT_BALANCE = [(3000, 0), (8000, 0.5), (13000, 5)]
# (frequency [Hz], left leads by [radians])
PORT_LEAD = [(300, -0.017), (950, -0.85), (2300, -0.42), (5200, 0.17), (12000, 1)]


def record(dry):
    sides = np.array([[.5], [-.5]])
    band = lambda f: (f < 15830) * lowpass(f, 13000, order=6)
    balance = lambda f: gain_from_db(sides * along(PORT_BALANCE, f))
    lead = lambda f: np.exp(1j * sides * along(PORT_LEAD, f))
    mix = filtered(dry, lambda f: balance(f) * lead(f) * band(f))
    return top_cut(mix)


dry = scene()
out = record(dry)
persist_wave(out)
```